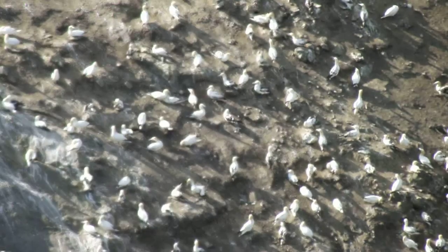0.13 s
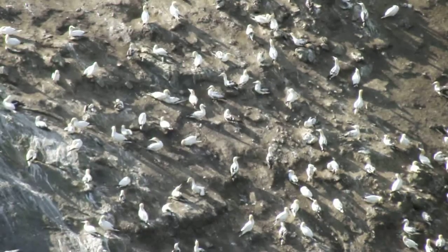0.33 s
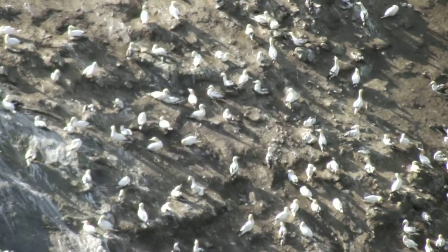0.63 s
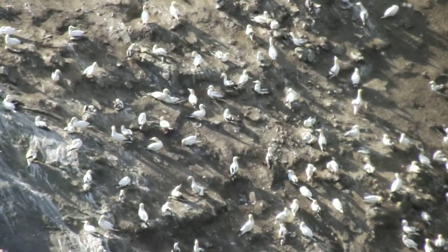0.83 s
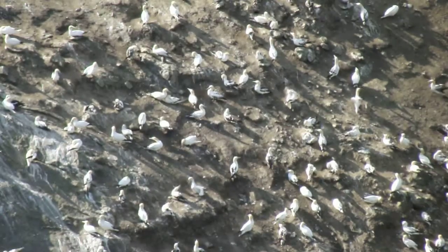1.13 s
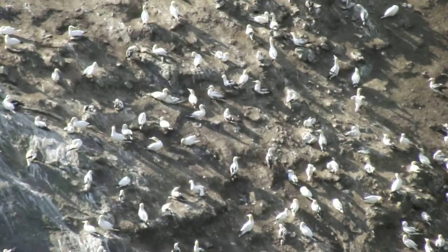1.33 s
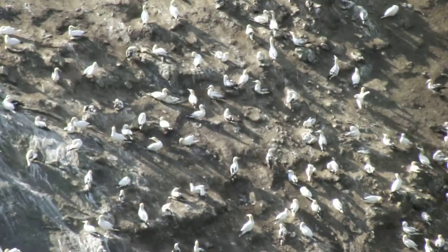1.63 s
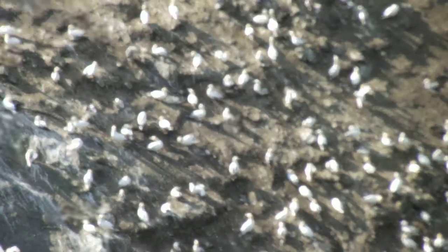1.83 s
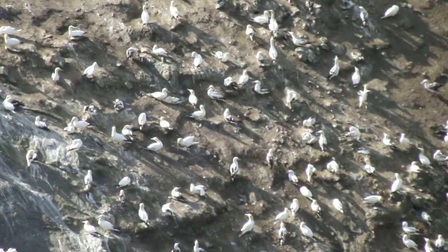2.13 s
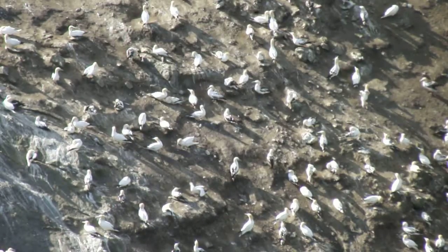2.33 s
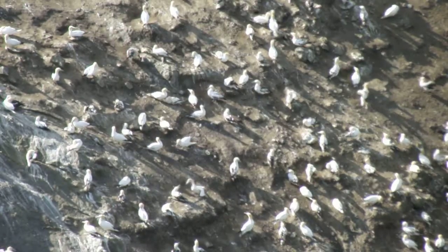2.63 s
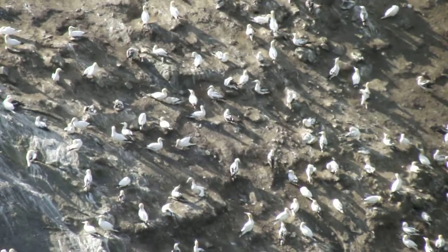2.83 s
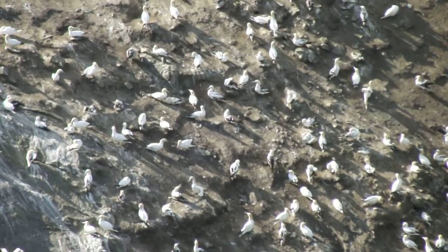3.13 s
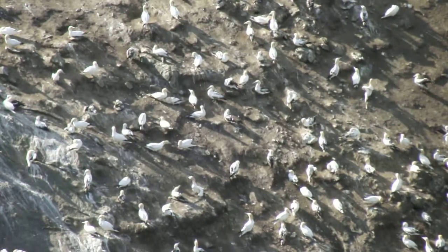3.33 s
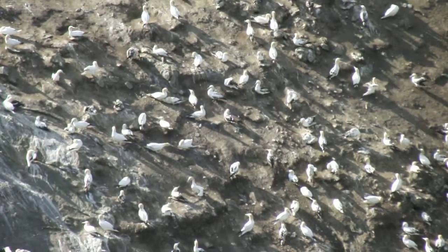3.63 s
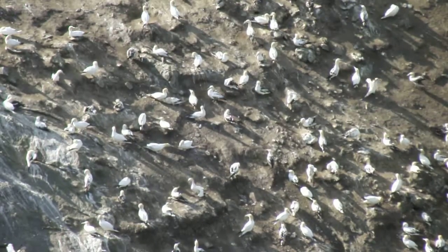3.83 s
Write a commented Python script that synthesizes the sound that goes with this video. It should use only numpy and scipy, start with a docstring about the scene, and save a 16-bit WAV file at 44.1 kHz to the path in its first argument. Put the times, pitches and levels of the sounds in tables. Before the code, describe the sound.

Wind buffets the microphone with uneven low rumbles from the start, easing around 2.5 seconds. It thumps at about 3.1 seconds and hits hardest, distorting, from 3.8 to 4 seconds. A distant seabird colony makes a steady harsh wash throughout, with brief nearer calls echoing lightly around 0.4, 1.3, 2.5 and 3.2 seconds. Faint lens motor ticks come mostly in the first three seconds, over a slight surf hiss.

```python
"""Gusty wind buffets a small camera's microphone on a cliff top, hardest near the end.
Far below, hundreds of harsh seabird calls (pulse trains through throat and beak) blur into a wash;
a few nearer ones echo off the cliff. A lens motor ticks and whines in the camera shell over a faint
hiss of surf and motor. The level drops in sudden steps on some of the strong buffets."""
import sys
import numpy as np
from scipy import signal
from scipy.fft import rfft, irfft
from scipy.io import wavfile
from scipy.ndimage import uniform_filter1d

SR = 44100
rng = np.random.default_rng(int(sys.argv[2]) if len(sys.argv) > 2 else 0)


def pcm_store(signal):
    """Save signal as 16-bit PCM."""
    levels = np.round(np.clip(np.atleast_2d(signal), -1, 1) * 32767)
    wavfile.write(sys.argv[1], SR, levels.astype(np.int16).T)


N = 176400

# Gust envelopes: (time [s], rumble [dB], thud [dB], flutter [dB])
GUST_LEVELS = [(0.0, -22, -19, -27), (0.06, -15, -19, -35), (0.13, -26, -31, -49), (0.16, -15, -28, -35),
               (0.26, -19, -24, -40), (0.54, -19, -31, -47), (0.66, -30, -50, -54), (0.9, -26, -36, -53),
               (1.07, -12, -21, -41), (1.14, -29, -30, -49), (1.43, -15, -26, -37), (1.49, -32, -38, -56),
               (1.63, -29, -51, -54), (1.7, -18, -29, -51), (1.86, -20, -28, -51), (2.05, -26, -48, -53),
               (2.14, -24, -36, -57), (2.18, -14, -33, -47), (2.34, -35, -50, -53), (2.85, -25, -36, -53),
               (3.16, -12, -19, -28), (3.24, -18, -35, -48), (3.36, -25, -30, -54), (3.41, -14, -18, -29),
               (3.53, -18, -33, -51), (3.66, -16, -17, -35), (3.74, -27, -27, -42), (3.78, -19, -17, -28),
               (3.815, -10, -5, -12), (3.85, -8, -8, -21), (3.9, -6, -7, -16), (4.0, -5.5, -7, -13)]
# Rumble, thud and flutter bands: (low [Hz], high [Hz], filter order)
WIND_BANDS = [(18, 58, 3), (60, 150, 4), (150, 380, 3)]
# Single pressure swells: (crest [s], signed pressure [full scale], width [s], level drop [dB])
BUFFETS = [(3.1445, -.5, .003, 0), (3.1507, .72, .0025, 3), (3.196, .7, .006, 0), (3.803, .55, .0035, 0),
           (3.8125, -.97, .001, 3), (3.8295, .9, .0015, 0), (3.844, 1.3, .005, 0), (3.8338, -1.2, .002, 3),
           (3.8653, -1.6, .003, 0), (3.8738, 1.2, .004, 3), (3.9443, 1.25, .003, 3)]
# Far colony envelope: (time [s], level [dB])
COLONY_LEVELS = [(0.0, -39), (0.44, -37), (1.8, -36.5), (2.42, -38), (2.69, -38), (3.08, -37.5),
                 (3.73, -37), (3.89, -38.5), (3.97, -35.5)]
# Far colony's tone colour, with a narrow camera-body resonance near 1460 Hz: (frequency [Hz], gain [dB])
COLONY_AND_BODY_COLOUR = [(240, -18), (400, -13), (576, -11), (753, -6), (1000, -8.5), (1400, -4.5),
                          (1462, 4.5), (1525, -1), (2080, -2.5), (2370, -8), (2750, -7), (3200, -5),
                          (3500, -10.5), (4240, -22.5), (5500, -36.5), (9000, -100)]
# Nearer birds: (time [s], level [dB], throat [Hz], length [s], pitch glide [fraction])
NEAR_CALLS = [(0.343, -24.5, 1854, 0.0068, -0.027), (0.381, -28.5, 1938, 0.085, -0.13),
              (0.46, -30.5, 3225, 0.017, 0.0058), (0.503, -28, 3315, 0.014, -0.051),
              (0.543, -26, 2185, 0.013, -0.011), (1.017, -32.5, 1430, 0.029, 0.088),
              (1.269, -29, 1560, 0.04, 0.0079), (1.321, -28, 3160, 0.046, -0.028),
              (1.378, -30.5, 1750, 0.033, 0.011), (2.209, -32.5, 3210, 0.043, -0.023),
              (2.259, -32, 3220, 0.035, -0.037), (2.5376, -24, 2130, 0.019, -0.0084),
              (2.816, -32, 1634, 0.012, 0.016), (2.894, -26, 2090, 0.017, -0.045),
              (2.927, -31.5, 2960, 0.017, 0.0076), (3.135, -31.5, 1480, 0.008, 0.025),
              (3.224, -23, 2182, 0.012, 0.025), (3.263, -26.5, 1995, 0.021, 0.14),
              (3.336, -26.5, 1910, 0.0077, -0.012), (3.768, -28.5, 3180, 0.026, 0.048),
              (3.7988, -27, 1443, 0.012, -0.026)]
# Lens gear scrapes: (time [s], relative level [dB], length [s])
GEAR_TICKS = [(0.051, -45.5, 0.013), (0.152, -41, 0.022), (0.173, -38.5, 0.0096), (0.25, -48.5, 0.0064),
              (0.603, -43, 0.013), (0.6893, -42.5, 0.014), (0.785, -45.5, 0.0063), (0.796, -42, 0.011),
              (0.884, -47.5, 0.0081), (0.9009, -44, 0.0058), (0.958, -41.5, 0.0077), (1.0373, -42, 0.005),
              (1.062, -41.5, 0.007), (1.0717, -40, 0.013), (1.091, -42, 0.0095), (1.106, -40.5, 0.0058),
              (1.511, -46, 0.0095), (1.598, -42, 0.0071), (1.611, -41.5, 0.0059), (1.697, -42, 0.013),
              (1.793, -45.5, 0.0089), (1.863, -45, 0.011), (1.875, -45, 0.011), (1.94, -48.5, 0.0098),
              (1.971, -39, 0.0064), (1.983, -39.5, 0.011), (2.001, -43.5, 0.017), (2.508, -43, 0.01),
              (2.52, -50, 0.005), (2.6, -46, 0.021), (2.714, -47, 0.0087), (2.732, -44.5, 0.0065),
              (3.702, -46, 0.0042)]
# Camera shell resonances: (centre [Hz], width [Hz], gain [dB])
SHELL_MODES = [(1390, 170, -16), (2100, 375, 9.5), (3095, 450, 8.5), (4504, 87, 1), (4970, 310, -9.5),
               (5920, 470, -9), (7440, 330, -4), (8360, 620, -10), (9350, 650, -14)]
# Motor whine: (frequency [Hz], level [dB])
WHINE_TONES = [(11472, -75)]
# Background hiss spectrum, with camera-motor peaks near 7.4 and 9.3 kHz: (frequency [Hz], gain [dB])
HISS_SPECTRUM = [(2500, -35.5), (3800, -9), (5000, -12.5), (6800, -15), (7400, -11.5), (9300, -9),
                 (10200, -15), (13000, -17), (15800, -20.5)]


def wind(eddy_hz=20, eddy_db=1.5, capsule_limit=1.25):
    """Eddies roll over the ports and strain the capsule; the strongest are single pressure swells."""
    t, eddies, pressure = np.arange(N) / SR, walk(eddy_hz), 0
    for k, (lo_hz, hi_hz, order) in enumerate(WIND_BANDS):
        flutter = undb(eddy_db * (k / 2 + 2) * (eddies + .5 * walk(40)))
        brown = np.cumsum(rng.standard_normal(N))
        pressure += unit(band(brown, lo_hz, hi_hz, order) * flutter) * undb(curve(GUST_LEVELS, k + 1))
    # The top band's flutter spills into the mids when strong.
    roar = unit(band(rng.standard_normal(N), 180, 720, order=2) * flutter)
    pressure += roar * undb(4 + 1.74 * np.minimum(curve(GUST_LEVELS, 3), -12))
    pressure = capsule_limit * np.tanh(pressure / capsule_limit)
    for crest_s, peak, width_s, _ in BUFFETS:
        swell = np.exp(-.5 * ((t - crest_s) / width_s) ** 2)
        pressure = pressure * (1 - swell) + peak * swell
    return pressure


def bird_call(throat_hz, length_s, glide, draws, rasp):
    """One harsh syllable: a gliding, rasping pulse train through throat and beak; rms 1/3."""
    throat_width_hz, beak_hz, beak_width_hz = 380, 3250, 250
    attack_s, clear_s, jitter_rad = .004, .037, .4
    t = np.arange(int(1.5 * length_s * SR)) / SR
    rough = min(clear_s / length_s, 1) ** 1.5  # long calls ring clearer
    free_pitch_hz = 600 * np.exp(.2 * draws[0])
    f0_hz = throat_hz / max(round(throat_hz / free_pitch_hz), 1)  # one harmonic on the throat peak
    i = int(abs(draws[1]) * SR) % (N // 2)
    shimmer, jitter = rasp[:, i:i + len(t)]
    phase = 2 * np.pi * f0_hz * (t + glide * t ** 2 / (2 * length_s)) + jitter_rad * rough * jitter
    k = np.arange(1, 9)[:, None]
    throat = 1 / (1 + ((k * f0_hz - throat_hz) / (throat_width_hz * rough)) ** 2)
    beak = .5 * rough / (1 + ((k * f0_hz - beak_hz) / beak_width_hz) ** 2)
    pulses = ((throat + beak) * np.cos(k * (phase + draws[2]))).sum(axis=0)
    envelope = np.minimum(t / attack_s, 1) * np.exp(-(t / length_s) ** 3)
    return unit(pulses * np.exp(.55 * rough * shimmer) * envelope) / 3


def colony(far_count=900, syllable_s=.02844, scatter_db=3, rasp_hz=210):
    """A crowd of far calls over a noise blur, plus nearer calls with their echo."""
    crowd, near = np.zeros(N), np.zeros(N)
    rasp = np.array([walk(rasp_hz), walk(rasp_hz)])
    spots = rng.random((far_count, 3))
    for (when, height, stretch), draws in zip(spots, rng.standard_normal((far_count, 5))):
        glide = .05 * (draws[3] - 1)  # most calls sag
        voice = bird_call(1000 + 2600 * height, syllable_s * (.5 + stretch), glide, draws, rasp)
        add(crowd, when * N / SR, undb(scatter_db * draws[4]) * voice)
    for start_s, db, throat_hz, length_s, glide in NEAR_CALLS:
        voice = bird_call(throat_hz, length_s, glide, rng.standard_normal(3), rasp)
        add(near, start_s, undb(db) * voice)
    near = band(near, 1160, 3580, order=5)
    blur = undb(-2) * rng.standard_normal(N) * undb(1.37 * walk(16))
    far = unit(colour(.28 * unit(crowd) + blur, COLONY_AND_BODY_COLOUR)) * undb(curve(COLONY_LEVELS))
    return far + near + cliff_echo(near)


def cliff_echo(x, gain_db=-7, t60_s=.49):
    """Diffuse reflection off the cliff: a decaying noise tail."""
    t = np.arange(int(t60_s * SR)) / SR
    tail = rng.standard_normal(len(t)) * undb(-60 * t / t60_s)
    return undb(gain_db) * signal.fftconvolve(x, unit(tail) / np.sqrt(len(t)))[:N]


def lens_motor(rattle_hz=422, tick_gain_db=13.5, buzz_drive_db=-50.5):
    """Short uneven gear scrapes and a faint steady buzz ring the shell; a thin whine on top."""
    t, scrapes = np.arange(N) / SR, np.zeros(N)
    grit = rng.standard_normal(N) * undb(walk(rattle_hz))
    for start_s, db, length_s in GEAR_TICKS:
        age_s, i = np.arange(int(2 * length_s * SR)) / SR, int(start_s * SR)
        envelope = undb(db) * np.exp(-(age_s / length_s) ** 2)
        add(scrapes, start_s, envelope * unit(grit[i:i + len(age_s)]))
    drive = scrapes * undb(tick_gain_db) + rng.standard_normal(N) * undb(buzz_drive_db)
    shell = sum((-1) ** k * undb(db) * ring(drive, hz, width_hz)
                for k, (hz, width_hz, db) in enumerate(SHELL_MODES))
    whine = sum(np.sqrt(2) * undb(db) * np.sin(2 * np.pi * hz * t) for hz, db in WHINE_TONES)
    return band(shell, 730, 10500) + whine


def background_hiss(floor_db=-59.5, spray_db=4.5, fade_s=.86, side_gain_db=-11.5):
    """Ebbing hiss of far surf with camera-motor peaks, as (mid, side)."""
    ebb = undb(spray_db * np.exp(-np.arange(N) / SR / fade_s) + .3 * walk(30.2))
    mid, side = (unit(colour(rng.standard_normal(N), HISS_SPECTRUM)) for _ in range(2))
    return np.array([mid, undb(side_gain_db) * side]) * undb(floor_db) * ebb


def level_steps(step_db=1.5, step_s=.032):
    """Gain that falls at once on marked buffet crests and climbs back in regular steps."""
    gain_db, held_db = np.zeros(N), 0
    drops = [(int(crest_s * SR), db) for crest_s, _, _, db in BUFFETS if db > 1]
    ends = [i for i, _ in drops[1:]] + [N]
    for (i, drop_db), j in zip(drops, ends):
        recovery_db = step_db * (np.arange(j - i) // int(step_s * SR))
        gain_db[i:j] = np.minimum(held_db - drop_db + recovery_db, 0)
        held_db = gain_db[j - 1]
    return undb(gain_db)


def undb(db):
    """Decibels to gain."""
    return 10 ** (np.asarray(db) / 20)


def unit(x):
    """Scale to rms 1."""
    return x / np.sqrt(np.mean(x ** 2))


def curve(table, column=1):
    """A table column over time."""
    table = np.array(table)
    return np.interp(np.arange(N) / SR, table[:, 0], table[:, column])


def colour(x, table):
    """Filter by (frequency [Hz], gain [dB]) points."""
    table, hz = np.array(table), np.arange(N // 2 + 1) * SR / N
    gain_db = np.interp(np.log(hz + 1), np.log(table[:, 0] + 1), table[:, 1])
    return irfft(rfft(x) * undb(gain_db), N)


def band(x, lo_hz, hi_hz, order=4):
    """Band-pass."""
    return signal.sosfilt(signal.butter(order, [lo_hz, hi_hz], "band", fs=SR, output="sos"), x)


def ring(x, hz, width_hz):
    """One resonance, gain 1 at the centre."""
    return signal.lfilter(*signal.iirpeak(hz, hz / width_hz, SR), x)


def walk(rate_hz):
    """Smooth random drift, rms 1."""
    hold = int(SR / rate_hz)
    stairs = np.repeat(rng.standard_normal(N // hold + 1), hold)
    return unit(uniform_filter1d(uniform_filter1d(stairs, hold), hold)[:N])


def add(out, start_s, x):
    """Mix x in at start_s."""
    i = max(int(start_s * SR), 0)
    out[i:i + len(x)] += x[:N - i]


def scene():
    """Wind, birds and motor centred; hiss slightly wide."""
    hiss_mid, side = background_hiss()
    mid = wind() + colony() + lens_motor() + hiss_mid
    return np.array([mid + side, mid - side])


def record(dry, port_lag_s=.00002, lag_above_hz=1340, cutoff_hz=15850):
    """Level steps, left port slightly late in the treble, clipping, low-pass."""
    hz = np.arange(N + 1) * SR / (2 * N)
    turn_rad = np.pi * hz * port_lag_s / (1 + (lag_above_hz / (hz + 1)) ** 4)
    padded = np.pad(dry * level_steps(), ((0, 0), (0, N)), "symmetric")
    ports = irfft(rfft(padded) * np.exp(1j * np.array([-turn_rad, turn_rad])))[:, :N]
    lowpass = signal.ellip(10, .2, 70, cutoff_hz, fs=SR, output="sos")
    return signal.sosfilt(lowpass, np.clip(ports, -1, 1))


dry = scene()
out = record(dry)
pcm_store(out)
```